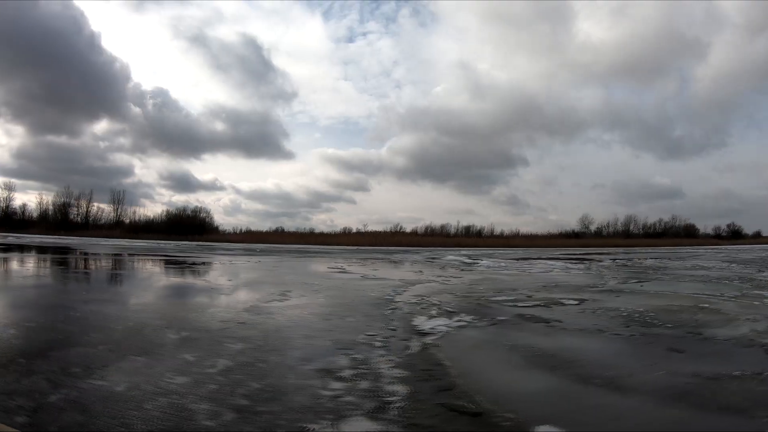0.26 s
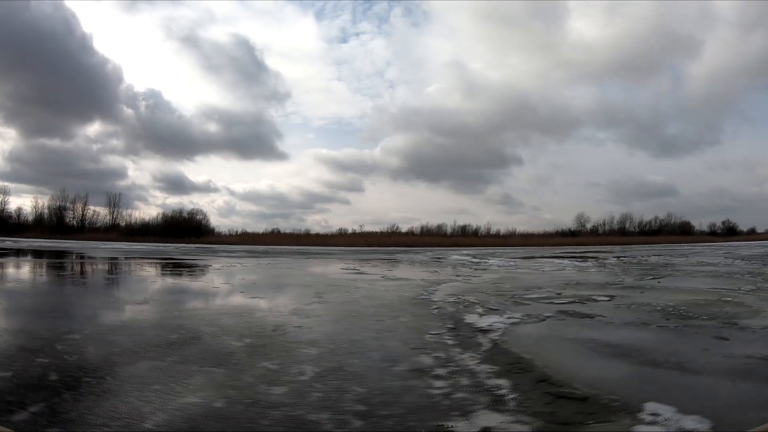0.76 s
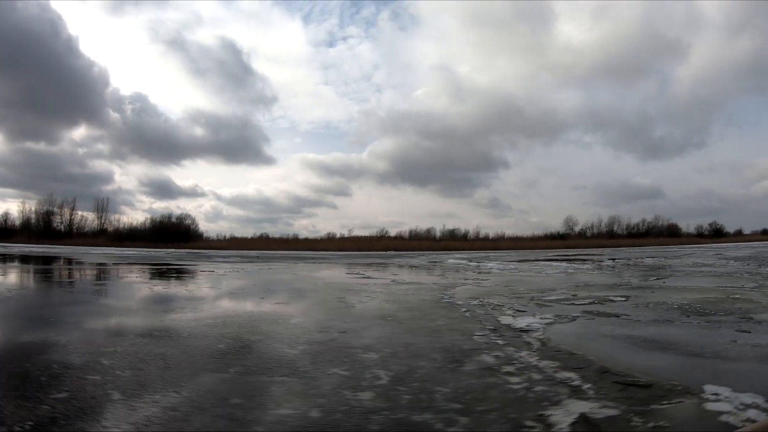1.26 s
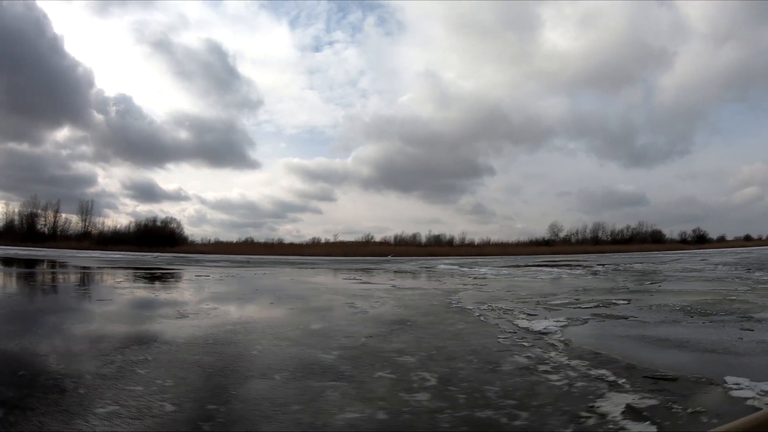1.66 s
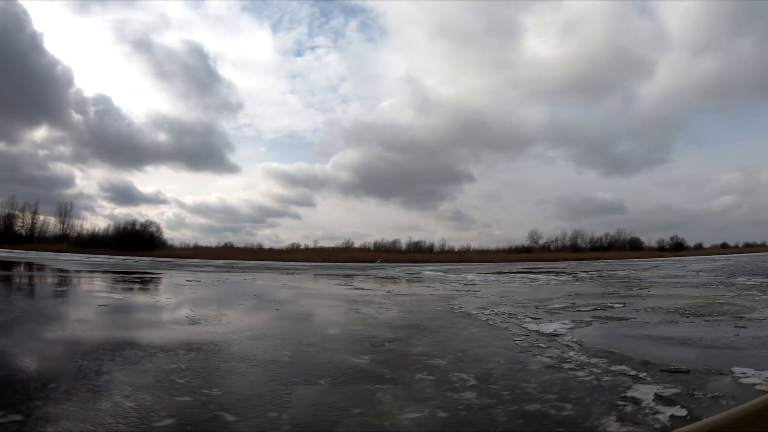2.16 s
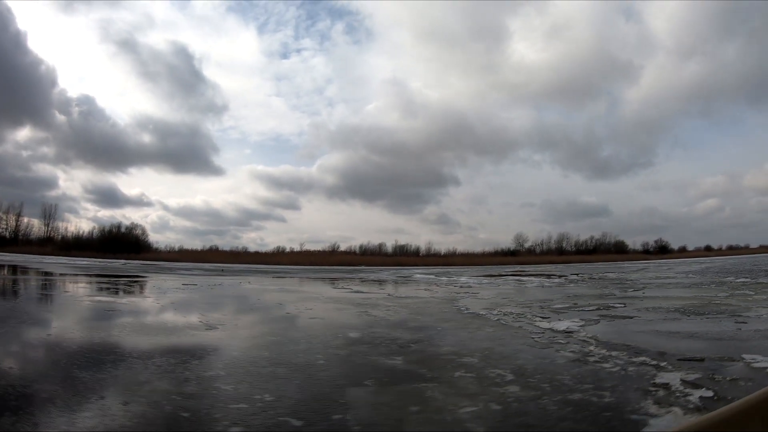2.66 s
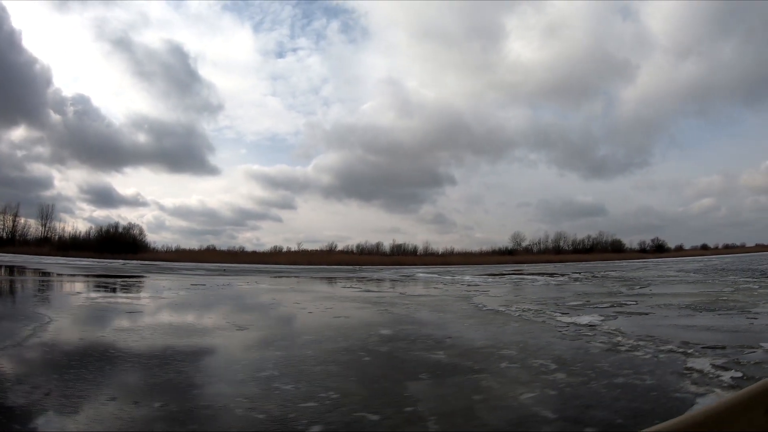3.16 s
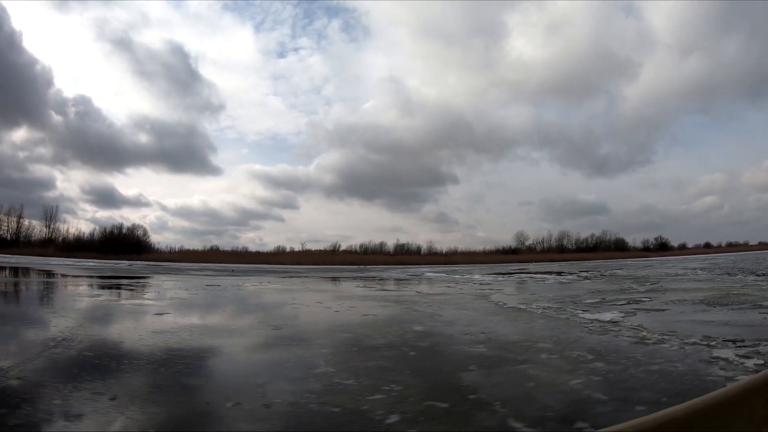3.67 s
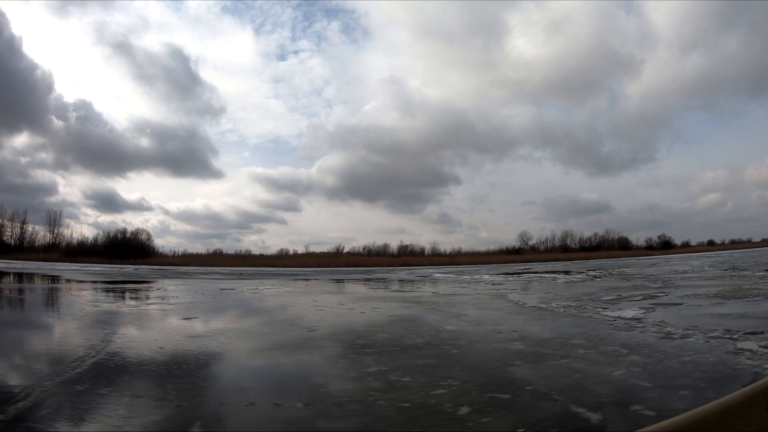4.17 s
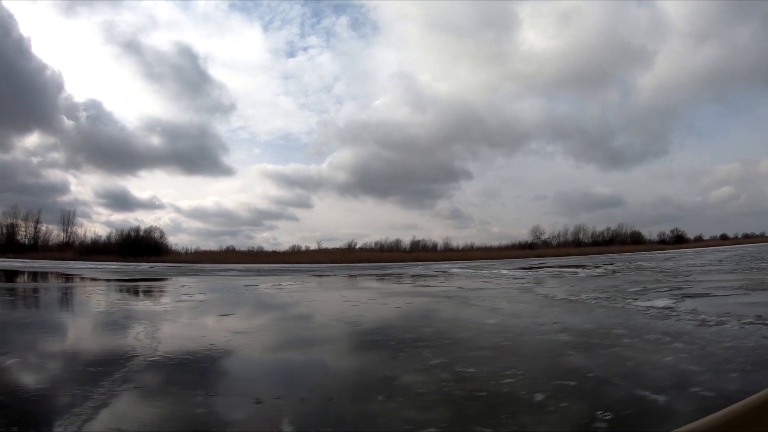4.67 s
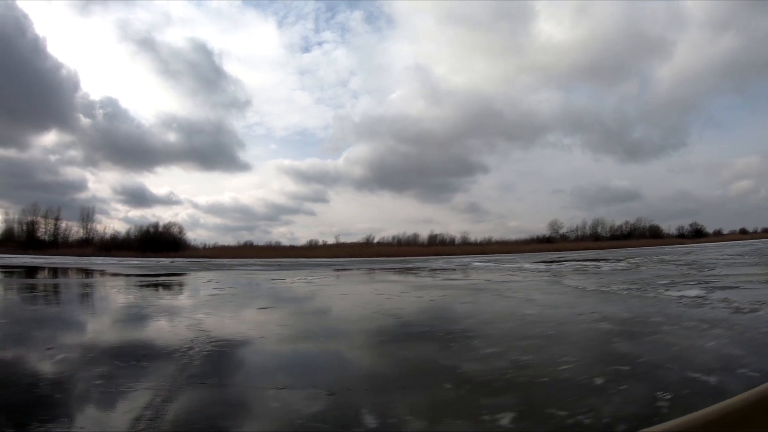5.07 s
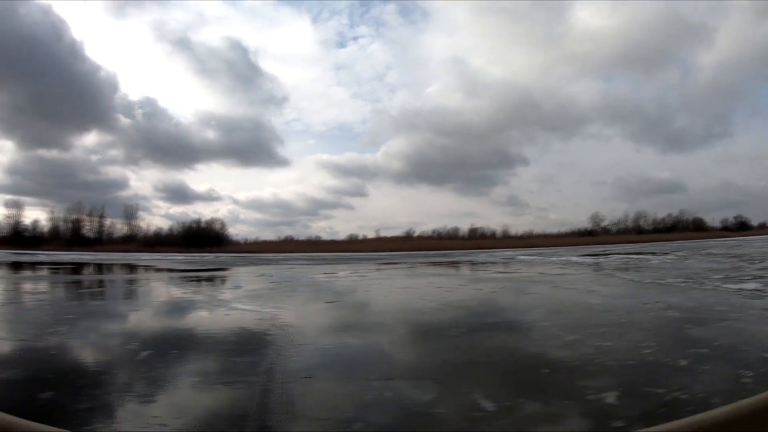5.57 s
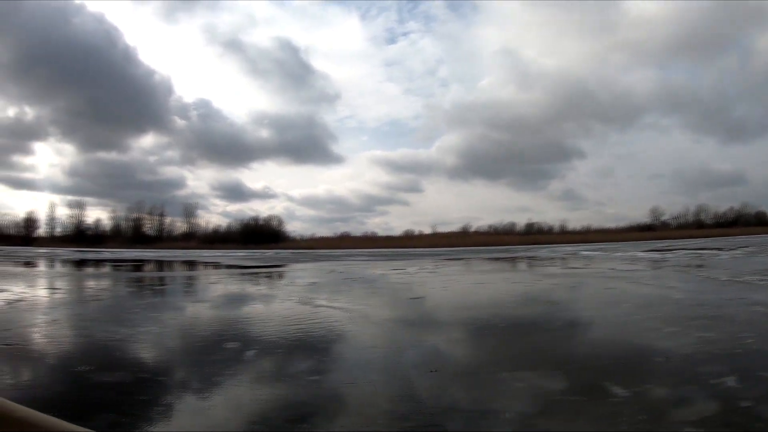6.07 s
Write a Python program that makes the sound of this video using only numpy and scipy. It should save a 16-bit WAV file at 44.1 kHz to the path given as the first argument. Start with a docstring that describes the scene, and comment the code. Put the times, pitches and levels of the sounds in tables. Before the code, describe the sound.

On open water, a light boat pushes through floating ice sheets. After a brief calm wash and a gap, slabs hit the hull in irregular dull thuds with rumbling resonance, while ice crumbles, snaps and clinks alongside. The blows crowd densest around two to three seconds, ease after four, then brighter cracking returns. Close, dry, slightly muffled sound from a cased microphone on board, with low gusts pressing on it.

```python
"""On board a light boat pushing through thin floating ice, heard through a small cased microphone.
A moment of calm water comes first (filtered noise), then a short silence and a quick fade into the ice.
Slabs knock (sinking tones) and drum (noise ringing the hull); ice grinds and cracks (bursts of noise).
Chunks clack and shards clink (short tones), splinters tick (puffs of noise), rubbing ice creaks,
rings and squeaks (rough tones), and wind buffets the microphone (deep noise)."""
import sys
import numpy as np
from scipy import signal
from scipy.fft import rfft, irfft
from scipy.io import wavfile
from scipy.ndimage import uniform_filter1d

SR = 44100
rng = np.random.default_rng(int(sys.argv[2]) if len(sys.argv) > 2 else 0)


def master_out(mix):
    """Clip the mix to full scale and print it as 16-bit PCM to the path in sys.argv[1]."""
    frames = np.transpose(np.atleast_2d(mix))
    ceiling = np.clip(frames, -1, 1)
    pcm = np.round(ceiling * 32767).astype(np.int16)
    wavfile.write(sys.argv[1], SR, pcm)


N = 278271  # length in samples

# All levels in the tables are those before the microphone.


def undb(db):
    """Turn decibels into a gain."""
    return 10 ** (np.asarray(db) / 20)


def unit(x):
    """Scale a sound to an rms of 1."""
    return x / np.sqrt(np.mean(x ** 2))


def curves(table):
    """Join each column of a table by straight lines in time."""
    s, *columns = np.transpose(table)
    return [np.interp(np.arange(N) / SR, s, column) for column in columns]


def colour(x, points):
    """Filter with the given (Hz, dB) curve, without sounding early, by folding the cepstrum of its log gain."""
    hz, db = np.transpose(points)
    size = 8192
    grid_hz = np.arange(size // 2 + 1) * SR / size
    log_gain = np.interp(np.log(grid_hz + 1 * SR / size * 0 + 1), np.log(hz), db) * np.log(10) / 20
    cepstrum = irfft(log_gain)
    cepstrum[1:size // 2] *= 2
    cepstrum[size // 2 + 1:] = 0
    return signal.fftconvolve(x, irfft(np.exp(rfft(cepstrum))))[:N]


def band(x, hz, width_hz):
    """Pass one resonance, with a gain of 1 at its centre."""
    return signal.lfilter(*signal.iirpeak(hz, hz / width_hz, SR), x)


def split_filter(x, order, hz, kind="low"):
    """Keep the part of a sound below (or above) a pitch."""
    return signal.sosfilt(signal.butter(order, hz, kind, fs=SR, output="sos"), x)


def walk(rate):
    """Wander at random: new levels come `rate` times a second and are smoothed twice."""
    k = int(SR / rate)
    steps = np.repeat(rng.standard_normal(N)[:N // k + 1], k)
    return uniform_filter1d(uniform_filter1d(steps, k), k)[:N]


def grit(rate, spread_db, tail_s):
    """Tiny fractures at random moments, few large and many small, each a short puff of noise."""
    when, size, noise = rng.random(N), rng.exponential(size=N), rng.standard_normal(N)
    power = (when < rate / SR) * undb(2 * spread_db * size)
    power = signal.lfilter([1], [1, -np.exp(-1 / (tail_s * SR))], power)
    return unit(noise * np.sqrt(power))


def clinks(rows):
    """Pieces of ice ring briefly as a close pair of tones; rows of start_s, level_db, pitch_hz, ring_s."""
    out, t = np.zeros(N + SR), np.arange(SR // 20) / SR
    for (s, db, hz, ring_s), (start, mate) in zip(rows, rng.random((len(rows), 2))):
        mate_hz = hz * (0.879 + 0.2 * mate)
        pair = np.sin(2 * np.pi * hz * t) + 0.72 * np.sin(2 * np.pi * (mate_hz * t + start))
        # ring_s is the time to fade by 60 dB
        shape = (1 - np.exp(-t / 0.00037)) * np.exp(-np.log(1000) * t / ring_s)
        i = int(s * SR)
        out[i:i + len(t)] += undb(db) * pair * shape
    return out[:N]


def rub(table, width_hz, patchy_db, grip):
    """A stick-slip tone whose grip slips at random becomes a rough band; a firm grip keeps a core of tone."""
    hz, db = curves(table)
    t = np.arange(N) / SR
    ends = np.clip(np.minimum(t - table[0][0], table[-1][0] - t) / 0.013, 0, 1)
    slips = signal.lfilter(*signal.butter(2, width_hz / 2, fs=SR), rng.standard_normal((2, N)))
    slips = unit(slips) + grip
    phase = 2 * np.pi * np.cumsum(hz + width_hz / 4 * walk(70)) / SR
    tone = unit(slips[0] * np.sin(phase) + slips[1] * np.cos(phase))
    return ends * undb(db + patchy_db * walk(37)) * tone


# tone curve of the calm water: pitch_hz [Hz], gain_db [dB, relative]
CALM_TONE = [(15, -59), (25, -7), (169, -8), (262, -12.5), (386, -29), (682, -32), (1030, -39), (1340, -34),
             (2180, -34.5), (4610, -48.5), (12000, -58), (15600, -108), (22000, -120)]
CALM_DB, CALM_END_S = -32.5, 0.096


def calm_water():
    """Calm water is steady noise, mostly low, that stops within two milliseconds."""
    water = unit(colour(rng.standard_normal(N), CALM_TONE))
    return undb(CALM_DB) * water * np.clip((CALM_END_S - np.arange(N) / SR) / 0.0018, 0, 1)


# wind over time: time_s [s], level_db [dB, before random gusts], quick_db [dB, gain of the quick eddies]
WIND_GUSTS = [(0.24, -27, 10.5), (0.54, -28, 7), (1.0, -21, -3), (1.2, -21, 1), (1.39, -24.5, -1),
              (1.65, -16, -2), (2.05, -26, -1), (2.37, -16.5, 1), (2.6, -21.5, -6), (2.83, -16, -2),
              (2.95, -25.5, -6), (3.65, -17.5, -11), (3.97, -17.5, -7), (4.3, -20, -12), (4.9, -30.5, -2.5),
              (5.02, -21.5, -6), (5.5, -24.5, -7), (5.73, -21.5, -1), (6.31, -28, 3)]
# tone curve of the wind: pitch_hz [Hz], gain_db [dB, relative]
WIND_TONE = [(12, -40.5), (25, 2), (60, 11), (100, 13.5), (150, 9), (300, -49.5)]


def wind():
    """Eddies press on the microphone port; quick ones sit higher than slow ones."""
    level_db, quick_db = curves(WIND_GUSTS)
    air = unit(colour(rng.standard_normal(N), WIND_TONE))
    slow = split_filter(air, 1, 55)
    return undb(level_db + walk(20)) * (slow + undb(quick_db) * (air - slow))


# loudness of loose pieces by pitch: pitch_hz [Hz], level_db [dB, relative]
SHARD_SIZES = [(500, -3.5), (900, -6), (1350, -4), (2000, -12), (2900, -8.5), (4200, -19), (6000, -23.5),
               (7800, -17.5)]
SHARDS_PER_S = 400


def shards():
    """Loose pieces of every size clink together at random, few loud and many faint."""
    when, size, loud = rng.random((int(SHARDS_PER_S * N / SR), 3)).T
    sizes_hz, sizes_db = np.transpose(SHARD_SIZES)
    hz = sizes_hz[0] * (sizes_hz[-1] / sizes_hz[0]) ** size
    db = np.interp(np.log(hz), np.log(sizes_hz), sizes_db) - 2 * np.log(1 - .97 * loud)
    ring_s = np.clip(0.004 + 14 / hz, .002, .04)  # high pieces ring shorter
    return unit(clinks(np.transpose([when * N / SR, db, hz, ring_s])))


# tone curve of the crumbling ice: pitch_hz [Hz], gain_db [dB, relative]
GRIND_TONE = [(150, -19), (400, 1.5), (800, -11), (1300, -9), (2500, -16), (4000, -22.5), (8000, -35),
              (11000, -35), (15000, -44.5)]


def grinding(level_db, bright_db):
    """Ice crumbles along the side, coarse to fine crumbs each in their own fits; brightness lifts the treble."""
    crumbs = colour(grit(700, 1.96, 0.0051) * undb(0.6 * walk(30)), GRIND_TONE)
    coarse = split_filter(crumbs, 1, 1100)
    middle = split_filter(crumbs - coarse, 1, 3200)
    fine = crumbs - coarse - middle
    crumbs = unit(sum(part * undb(2.0 * walk(25)) for part in (coarse, middle, fine)))
    crackle = unit(band(grit(40, 2.9, 0.0018), 8000, 7000))
    crumbs = crumbs + undb(-5) * shards() + undb(-49.0) * crackle
    treble = split_filter(crumbs, 2, 4500, "high")
    return undb(level_db) * (crumbs + (undb(bright_db) - 1) * treble)


# a slab creaks along the side, rising overall: time_s [s], pitch_hz [Hz], level_db [dB]
CREAK_PATH = [(3.33, 375, -31), (3.45, 394, -27), (3.53, 412, -28), (3.56, 392, -29), (3.61, 405, -27),
              (3.64, 410, -42), (3.68, 425, -29), (3.76, 438, -30), (3.87, 450, -33)]


def creak():
    """A firm grip keeps a clear tone in the rubbing."""
    return rub(CREAK_PATH, width_hz=30, patchy_db=1.5, grip=4)


# a thin rough ring near the end: time_s [s], pitch_hz [Hz], level_db [dB]
RING_PATH = [(5.88, 2060, -47), (6.05, 2055, -44.5), (6.36, 2045, -44)]


def rough_ring():
    """A loose grip spreads the tone into a rough band."""
    return rub(RING_PATH, width_hz=100, patchy_db=2, grip=.6)


# a brief squeak: time_s [s], pitch_hz [Hz], level_db [dB]
SQUEAK_PATH = [(5.32, 3380, -49), (5.365, 3400, -42.5), (5.41, 3350, -49)]


def squeak():
    """An even looser grip makes a wide, high band."""
    return rub(SQUEAK_PATH, width_hz=260, patchy_db=2, grip=.4)


# single bright ticks of thin ice: start_s [s], level_db [dB], pitch_hz [Hz]
TICK_EVENTS = [(0.46, -33, 6800), (0.9774, -31, 6530), (1.1404, -30, 6740), (1.1704, -29, 6680),
               (1.2716, -32, 7370), (1.3694, -36, 6630), (1.614, -34, 6960), (1.76, -36, 6810),
               (2.0109, -30, 9740), (2.0698, -39, 8160), (2.2095, -30, 6400), (2.3172, -33, 9180),
               (2.4864, -36, 7210), (2.5377, -29, 6700), (2.6929, -40, 6770), (2.998, -35, 9490),
               (3.12, -32, 9580), (3.533, -27.5, 5900), (3.755, -34, 6930), (4.0753, -27, 6200),
               (4.243, -35, 8200), (4.3663, -32, 6700), (4.326, -37, 7500), (4.449, -37, 7500),
               (4.657, -39, 7500), (4.7064, -26, 6300), (4.834, -32, 6300), (4.86, -30, 6600),
               (5.0527, -26.5, 6840), (5.0805, -33, 7600), (5.102, -24, 6360), (5.1274, -25, 7260),
               (5.308, -24, 7950), (5.5634, -31, 5600), (5.5888, -27, 6530), (5.6123, -15.5, 7800),
               (5.622, -21, 8400), (5.6383, -16, 8250), (5.744, -28, 7980), (5.856, -18.5, 7100),
               (6.0442, -22.5, 6070), (6.206, -39, 7500), (6.2984, -21, 6240)]
TICK_RISE_S, TICK_DECAY_S = 0.0005, 0.0024
TICK_WIDTH = 0.35  # width of each of its two filters, as a share of the pitch


def ticks():
    """A splinter breaks off: a puff of a few milliseconds around its own pitch, with a hiss on top."""
    out, t = np.zeros(N + SR), np.arange(SR // 20) / SR
    puff = (1 - np.exp(-t / TICK_RISE_S)) * np.exp(-t / TICK_DECAY_S)
    for (s, db, hz), noise in zip(TICK_EVENTS, rng.standard_normal((len(TICK_EVENTS), len(t)))):
        width_hz = TICK_WIDTH * hz
        pitched = unit(band(band(noise, hz, width_hz), hz, width_hz))
        sound = puff * (pitched + 0.3 * unit(np.gradient(noise)))
        i = int(s * SR)
        out[i:i + len(t)] += undb(db) * sound * np.sqrt(np.sum(puff ** 2) / np.sum(sound ** 2))
    return out[:N]


# sheets cracking: start_s [s], level_db [dB, lowered by CREST_DB], body_db [dB above the snap],
# length_s [s, scaled for each layer]
CRACK_EVENTS = [(0.227, -33, 20, 0.015), (0.294, -35, 12, 0.021), (0.331, -22.5, -6, 0.013),
                (0.638, -27.5, 12, 0.014), (0.697, -25.5, 14, 0.0075), (0.812, -38, 20, 0.012),
                (0.893, -37, 19, 0.019), (0.976, -32, 8.5, 0.15), (1.086, -32, 12, 0.082),
                (1.162, -27.5, 11.5, 0.03), (1.236, -37, 18.5, 0.028), (1.366, -20, 4, 0.024),
                (1.411, -24.5, 4, 0.019), (1.439, -34.5, 21, 0.027), (1.486, -22.5, 16, 0.0094),
                (1.615, -20, 6, 0.0061), (1.698, -33, 14, 0.0062), (1.76, -28, -3, 0.028),
                (1.81, -17, 14.5, 0.0048), (1.949, -30, 13.5, 0.047), (2.0085, -21.5, -6, 0.023),
                (2.067, -22, 13, 0.017), (2.09, -26, 6, 0.013), (2.132, -28.5, 15, 0.015),
                (2.139, -32, 6, 0.025), (2.2014, -24, 3, 0.017), (2.302, -27, 5.5, 0.039),
                (2.33, -20, 8, 0.021), (2.415, -19.5, 4, 0.018), (2.536, -25, 15.5, 0.008),
                (2.692, -27, 13.5, 0.017), (2.85, -20, 12.5, 0.0073), (2.854, -38, 5, 0.01),
                (2.993, -21, 8, 0.017), (3.005, -21, -1, 0.025), (3.115, -26.5, 11.5, 0.036),
                (3.254, -28.5, 14, 0.019), (3.3344, -25.5, 2, 0.015), (3.402, -32, 15, 0.026),
                (3.461, -25, -9, 0.027), (3.533, -18.5, 9, 0.013), (3.738, -25.5, 9, 0.042),
                (4.075, -27, 9.5, 0.023), (4.184, -28, 5, 0.05), (4.247, -15.5, -1, 0.021),
                (4.372, -29, -4, 0.017), (4.407, -19, -3, 0.008), (4.425, -23.5, -2, 0.039),
                (4.484, -20.5, 4, 0.05), (4.53, -33, 12, 0.025), (4.68, -26, -4, 0.057),
                (4.705, -13.5, 5.5, 0.013), (4.785, -24, -12, 0.025), (4.846, -39, -3, 0.011),
                (4.86, -28, -8, 0.012), (4.887, -23.5, 0, 0.018), (4.938, -25.5, 8, 0.028),
                (5.022, -30.5, 14.5, 0.049), (5.071, -19.5, 3.5, 0.036), (5.098, -20.5, 4, 0.026),
                (5.13, -25, 9, 0.018), (5.197, -27.5, -16, 0.16), (5.296, -24.5, 9, 0.039),
                (5.391, -24, -2, 0.014), (5.457, -33.5, 10.5, 0.1), (5.554, -33, -1, 0.013),
                (5.6, -18, -9, 0.034), (5.633, -21, 1.5, 0.048), (5.714, -27.5, -6, 0.032),
                (5.742, -20, -3, 0.017), (5.755, -20.5, -3, 0.012), (5.82, -31, 13, 0.013),
                (5.852, -16, 8.5, 0.025), (5.934, -24, 9, 0.049), (6.038, -18.5, 11, 0.02),
                (6.1, -26, 6, 0.018), (6.148, -40, 14, 0.013), (6.202, -35, 21.5, 0.022),
                (6.292, -25, 16, 0.015)]
CREST_DB = 12.5  # allowance for the peaks of a crackle above its rms
# centre and width of each filter; every layer is filtered twice
BODY_HZ, BODY_WIDTH_HZ, BODY_RISE_S = 554, 1060, 0.0063
SNAP_HZ, SNAP_WIDTH_HZ, CRACK_RISE_S = 1620, 4000, 0.0017
SPLINTER_HZ, SPLINTER_WIDTH_HZ = 9500, 5000
SPLINTER_DB = -18.5  # relative to the snap, before the brightness of the ice is added


def cracks(bright_db):
    """Each crack runs through the sheet for a moment, then stops; the thick body outlasts the splinters."""
    out, t = np.zeros(N + SR), np.arange(SR // 5) / SR
    layers = [grit(1400, 1.8, 0.00058) for _ in range(3)]
    for s, db, body_db, length_s in CRACK_EVENTS:
        i = int(s * SR)
        splinter_db = SPLINTER_DB + bright_db[i]
        # centre, width, level, stretch of the length, rise time
        parts = ((BODY_HZ, BODY_WIDTH_HZ, body_db, 1.4, BODY_RISE_S),
                 (SNAP_HZ, SNAP_WIDTH_HZ, 0, 1.05, CRACK_RISE_S),
                 (SPLINTER_HZ, SPLINTER_WIDTH_HZ, splinter_db, .9, CRACK_RISE_S))
        for fractures, (hz, width_hz, part_db, stretch, rise_s) in zip(layers, parts):
            run = t / (max(length_s, .001) * stretch)
            # a main burst with a faint, longer tail
            burst = (1 - np.exp(-t / rise_s)) * (np.exp(-run ** 1.78) + 0.11 * np.exp(-run / 7.6))
            piece = np.roll(fractures, -i)[:len(t)]
            sound = band(band(piece, hz, width_hz), hz, width_hz) * burst
            level = np.sqrt(np.sum(burst ** 2) / np.sum(sound ** 2))
            out[i:i + len(t)] += undb(db + part_db) * sound * level
    return undb(-CREST_DB) * out[:N]


# chunks of ice against the side: start_s [s], level_db [dB, main tone], pitch_hz [Hz],
# ring_s [s, to fade by 60 dB]
CLACK_EVENTS = [(0.296, -24, 1410, 0.042), (0.64, -24, 630, 0.029), (1.096, -28, 835, 0.03),
                (1.171, -28, 2550, 0.029), (1.174, -27, 1270, 0.032), (1.482, -31, 2650, 0.029),
                (1.482, -22, 1290, 0.03), (1.497, -22, 666, 0.03), (1.502, -17, 400, 0.027),
                (1.81, -23, 1770, 0.03), (1.812, -28, 1350, 0.033), (2.074, -40, 3120, 0.022),
                (2.075, -31, 4700, 0.025), (2.084, -9.5, 515, 0.04), (2.089, -22, 1450, 0.032),
                (2.098, -19, 654, 0.03), (2.135, -16.5, 1050, 0.045), (2.138, -7, 380, 0.082),
                (2.144, -30, 1481, 0.03), (2.145, -23, 2040, 0.03), (2.157, -8, 430, 0.05),
                (2.317, -26, 1450, 0.043), (2.334, -32, 1910, 0.028), (2.335, -31, 1309, 0.03),
                (2.856, -30, 1500, 0.025), (2.858, -11.5, 800, 0.032), (2.859, -16, 520, 0.027),
                (2.88, -24, 840, 0.03), (3.001, -28, 1550, 0.04), (3.016, -19.5, 954, 0.097),
                (3.022, -17, 477, 0.04), (3.02, -32, 4000, 0.033), (3.405, -39, 710, 0.023),
                (3.409, -26, 1830, 0.025), (3.849, -19.5, 617, 0.025), (4.257, -27, 2100, 0.032),
                (4.261, -29, 2970, 0.056), (4.409, -26, 2330, 0.019), (4.49, -23, 2430, 0.025),
                (4.491, -28, 1275, 0.03), (4.506, -36, 2016, 0.03), (4.705, -33, 1950, 0.03),
                (4.708, -21, 2870, 0.012), (4.708, -13, 1360, 0.024), (4.709, -19, 700, 0.045),
                (4.72, -21, 1530, 0.034), (4.948, -28, 1710, 0.03), (5.075, -30, 1723, 0.025),
                (5.085, -15.5, 1120, 0.025), (5.101, -34, 3020, 0.029), (5.102, -37, 4350, 0.025),
                (5.105, -24, 1370, 0.029), (5.107, -35, 2153, 0.03), (5.124, -28, 4150, 0.022),
                (5.126, -20, 1200, 0.033), (5.129, -11, 494, 0.026), (5.141, -31, 1100, 0.03),
                (5.292, -25, 1619, 0.032), (5.553, -23, 700, 0.025), (5.563, -27, 3870, 0.016),
                (5.61, -40, 4700, 0.029), (5.61, -19, 2600, 0.024), (5.637, -30, 3300, 0.018),
                (5.638, -31, 2170, 0.034), (5.853, -39, 4630, 0.029), (5.859, -35, 1760, 0.03),
                (5.863, -34, 1310, 0.03), (5.864, -38, 2620, 0.036), (5.879, -8, 520, 0.036),
                (5.95, -34, 2067, 0.03), (6.047, -20.5, 1310, 0.037), (6.048, -23, 930, 0.033),
                (6.062, -20, 910, 0.039), (6.114, -28, 1460, 0.04), (6.128, -27, 1040, 0.049),
                (6.206, -20, 1340, 0.05), (6.21, -30, 1620, 0.032), (6.217, -23, 2050, 0.03)]


def clacks():
    """Chunks of ice clack against the side, each ringing as a pair of tones."""
    return clinks(CLACK_EVENTS)


# slabs knocking the hull: start_s [s], level_db [dB, main tone], pitch_hz [Hz, at the start],
# contact_s [s, before the ring fades]
KNOCK_EVENTS = [(0.253, -10, 102.3, 0.024), (0.302, -11, 100, 0.0066), (0.298, -3.5, 213.7, 0.022),
                (0.344, -10.5, 118, 0.022), (0.364, -12.5, 179, 0.037), (0.384, -14, 108, 0.0099),
                (0.449, -21, 128, 0.023), (0.594, -11, 129, 0.021), (0.666, -10, 177, 0.012),
                (0.689, -16, 99, 0.014), (0.73, -15, 92.5, 0.011), (0.941, -12, 139, 0.0044),
                (0.997, -12, 99, 0.012), (1.048, -17, 116.4, 0.039), (1.079, -16.5, 100, 0.022),
                (1.096, -6.5, 208, 0.01), (1.144, -10.5, 291, 0.0057), (1.153, -4.5, 104, 0.005),
                (1.269, -14.5, 158.3, 0.033), (1.391, -25, 172, 0.006), (1.478, -9, 182, 0.019),
                (1.527, -12.5, 190, 0.022), (1.56, -15, 92, 0.05), (1.663, -9.5, 119, 0.011),
                (1.72, -18, 100, 0.008), (1.755, -15, 106, 0.021), (1.812, -2, 224, 0.0065),
                (1.873, -27, 152, 0.0055), (1.991, -11, 166, 0.0065), (2.0882, -2.5, 283, 0.0059),
                (2.101, -12, 190, 0.01), (2.115, -11, 215, 0.0061), (2.164, -9, 177, 0.016),
                (2.187, -8, 115, 0.0062), (2.321, -7.5, 170, 0.012), (2.346, -6, 245, 0.019),
                (2.372, -7, 216, 0.0086), (2.412, -4, 219.4, 0.024), (2.46, -6.5, 163, 0.016),
                (2.481, -13, 107, 0.016), (2.55, -5.5, 206, 0.0033), (2.56, -4, 92, 0.0053),
                (2.697, -9.5, 121, 0.016), (2.831, -2.5, 167, 0.0062), (2.836, -17, 247, 0.086),
                (2.858, -4, 257, 0.0055), (3.001, -11.5, 408, 0.01), (3.015, -13, 180, 0.047),
                (3.02, -9.5, 338, 0.0059), (3.105, -10, 182, 0.0084), (3.318, -9.5, 188, 0.026),
                (3.358, -10, 171, 0.008), (3.392, -19, 179, 0.028), (3.404, -8.5, 215.6, 0.02),
                (3.49, -8.5, 206, 0.014), (3.878, -11, 195, 0.0054), (3.951, -12, 163, 0.014),
                (4.041, -13, 106, 0.0042), (4.109, -7.5, 139, 0.0042), (4.191, -16.5, 229, 0.0097),
                (4.718, -16.5, 212, 0.01), (5.08, -16.5, 259, 0.012), (5.096, -18.5, 176, 0.017),
                (5.28, -14.5, 139, 0.017), (5.277, -2, 217, 0.0035), (5.372, -10, 187, 0.006),
                (5.394, -1.5, 227, 0.0034), (5.658, -14, 288, 0.0052), (5.668, -14.5, 233, 0.039),
                (5.7, -20, 189.5, 0.064), (5.729, -9, 209, 0.028), (5.732, -9, 215, 0.047),
                (5.845, -24, 152, 0.039), (5.85, -14, 154, 0.02), (5.974, -14.5, 480, 0.0049),
                (6.05, -10, 184, 0.0064)]
KNOCK_RING_S = 0.052  # time to fade by 60 dB after the contact
KNOCK_SAG_PER_S = 0.76  # share of the starting pitch lost per second


def knocks():
    """A blow or shove rings a hull panel and its upper neighbour while contact lasts; the pitch sags a little."""
    out, t = np.zeros(N), np.arange(SR // 2) / SR
    for (s, db, hz, contact_s), start in zip(KNOCK_EVENTS, rng.random(len(KNOCK_EVENTS))):
        turn = 2 * np.pi * hz * t * (1 - KNOCK_SAG_PER_S / 2 * t)
        ring = 0.28 * np.sin(1.7 * turn + 2 * np.pi * start) - np.sin(turn)
        fade = np.exp(-np.log(1000) * np.clip(t - contact_s, 0, None) / KNOCK_RING_S)
        ring *= (1 - np.exp(-t / 0.0026)) * fade
        i = int(s * SR)
        out[i:i + len(t)] += undb(db) * ring[:N - i]
    return out


# slabs riding under the bow: start_s [s], drumming_db [dB], hold_s [s],
# weight_db [dB per octave down, at the start]
SLAB_EVENTS = [(0.31, -18.5, 0.098, 10), (0.639, -18, 0.023, 0), (1.103, -24, 0.11, -25),
               (1.436, -16, 0.09, -12.5), (1.802, -14.5, 0.023, 5.5), (1.997, -21, 0.05, -21),
               (2.088, -15.5, 0.094, 2), (2.321, -12.5, 0.06, 0), (2.43, -19.5, 0.039, -17),
               (2.538, -21, 0.1, 9.5), (2.686, -19, 0.016, -4.5), (2.832, -16.5, 0.013, -5),
               (2.991, -14, 0.054, -7), (3.302, -18.5, 0.069, -1), (3.519, -20.5, 0.074, -7.5),
               (3.936, -25, 0.019, 7.5), (4.124, -24.5, 0.038, -5.5), (4.224, -22.5, 0.034, 15),
               (4.575, -22.5, 0.073, 8), (5.079, -21.5, 0.078, -16), (5.266, -18.5, 0.043, 0.5),
               (5.368, -19, 0.031, 5), (5.665, -24.5, 0.15, -1.5), (5.794, -18.5, 0.13, -10),
               (6.055, -17, 0.075, -7), (6.18, -24, 0.038, 7.5)]
SLAB_RISE_S, SLAB_RELEASE_S = 0.0065, 0.043
STEADY_WEIGHT_DB = 8  # dB per octave down, for the steady push
SINK_DB_PER_S = 55  # a slab's weight grows for 0.2 s as it slides under the hull


def slabs(steady_db):
    """Each slab swells the drumming fast, holds and lets go; gives the level and weight at each moment."""
    t = np.arange(N) / SR
    power = undb(2 * steady_db)
    weighted = power * STEADY_WEIGHT_DB
    for s, db, hold_s, weight_db in SLAB_EVENTS:
        rise = np.clip((t - s) / SLAB_RISE_S, 0, 1)
        release = np.exp(-np.clip(t - s - SLAB_RISE_S - hold_s, 0, None) / SLAB_RELEASE_S)
        slab_power = (undb(db) * rise * release) ** 2
        slab_weight = weight_db + SINK_DB_PER_S * np.clip(t - s, 0, .2)
        power = power + slab_power
        weighted = weighted + slab_weight * slab_power
    return 10 * np.log10(power), weighted / power


# broad panel modes: pitch_hz [Hz], width_hz [Hz, doubled in a second filter], level_db [dB, relative]
HULL_MODES = [(130.7, 67, -7.5), (175.4, 53, 2), (211, 59, 0), (250.6, 84, 0.5), (338.4, 155, -6),
              (426, 67, -24)]


def hull(level_db, weight_db):
    """A hail of ice blows rings the broad panel modes; heavier slabs favour those below 200 Hz."""
    blows = grit(200, 1.95, 0.018)
    modes = 0
    for hz, width_hz, db in HULL_MODES:
        mode = band(band(blows, hz, width_hz), hz, 2 * width_hz)
        modes = modes + undb(db + weight_db * np.log2(200 / hz)) * mode
    return undb(level_db) * unit(modes)


# steady push of the ice: time_s [s], drumming_db [dB], grinding_db [dB, before the slabs],
# brightness_db [dB, treble gain]
PUSH_PATH = [(0.24, -18.5, -35, -13), (0.39, -19.5, -37, 3), (0.85, -20, -34, 6), (1.44, -19.5, -33.5, 6),
             (1.9, -19.5, -32.5, 5.5), (2.22, -18.5, -33.5, 7), (2.81, -21, -38.5, 7), (3.42, -17, -34, 7),
             (3.74, -25, -34, 5.5), (4.21, -31, -32.5, 4.5), (4.99, -24, -29, 2.5), (5.28, -18, -29.5, 2),
             (5.45, -17, -33.5, 6.5), (5.92, -17, -33, 10), (6.11, -32.5, -33.5, 5.5), (6.31, -17, -31, 4)]
GRIND_FOLLOWS = 0.12  # share of a slab's swell in dB that the grinding takes over
FADE_S, FADE_END_S = 0.163, 0.235  # the ice fades in


def scene():
    """Calm water, a gap, then the ice with the wind."""
    steady_db, grind_db, bright_db = curves(PUSH_PATH)
    hull_db, weight_db = slabs(steady_db)
    grind_db = grind_db + GRIND_FOLLOWS * (hull_db - steady_db)
    ice = wind() + grinding(grind_db, bright_db)
    ice += creak() + rough_ring() + squeak()
    ice += ticks() + cracks(bright_db) + clacks()
    ice += knocks() + hull(hull_db, weight_db)
    fade = np.clip((np.arange(N) / SR - FADE_S) / (FADE_END_S - FADE_S), 0, 1) ** 2
    return (calm_water() + fade * ice)[None]


# tone curve of the microphone in its case: pitch_hz [Hz], gain_db [dB]
MIC_TONE = [(20, 2), (4300, -5.5), (5300, -4), (5900, -11), (7500, -9), (10100, -10), (11000, -20),
            (12000, -22.5), (14300, -22.5), (15500, -53)]
TOP_HZ = 15600


def record(dry):
    """The cased microphone dulls the treble in steps and rounds the loudest blows; the top is cut."""
    heard = np.tanh(colour(dry[0], MIC_TONE) * 1.06) / 1.197
    return signal.sosfilt(signal.ellip(8, .2, 70, TOP_HZ, fs=SR, output="sos"), heard)[None]


dry = scene()
out = record(dry)
master_out(out)
```